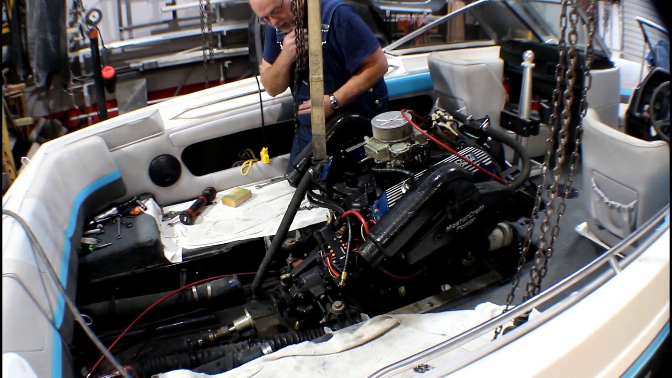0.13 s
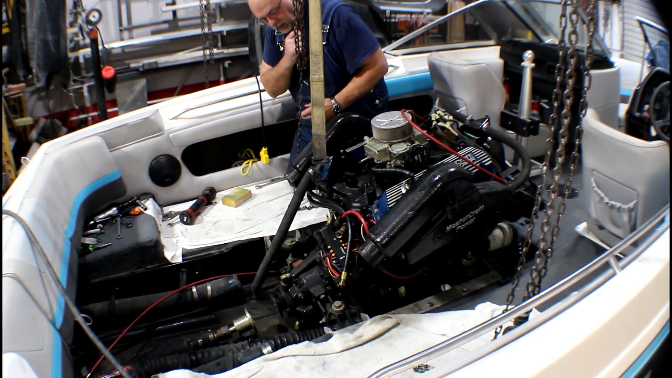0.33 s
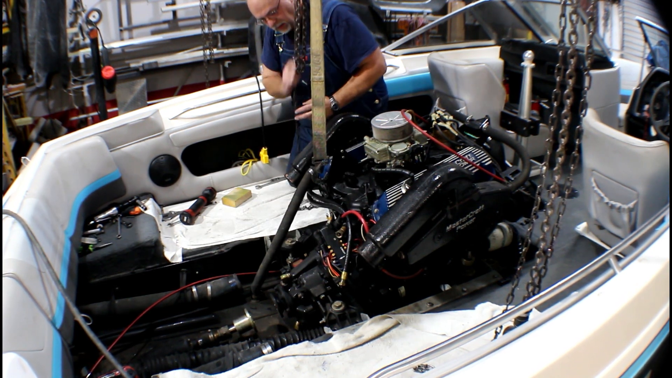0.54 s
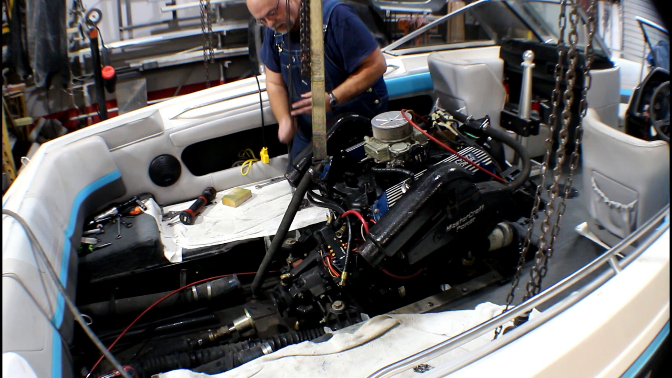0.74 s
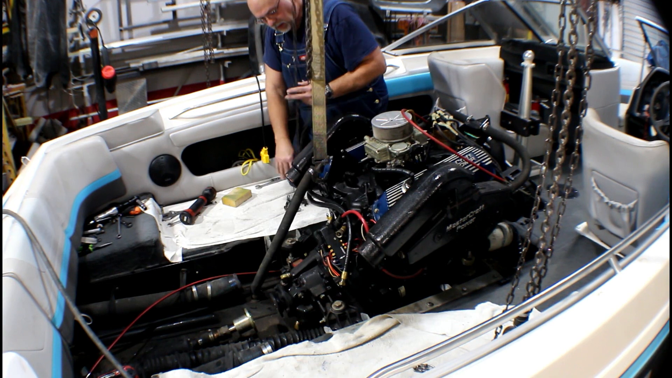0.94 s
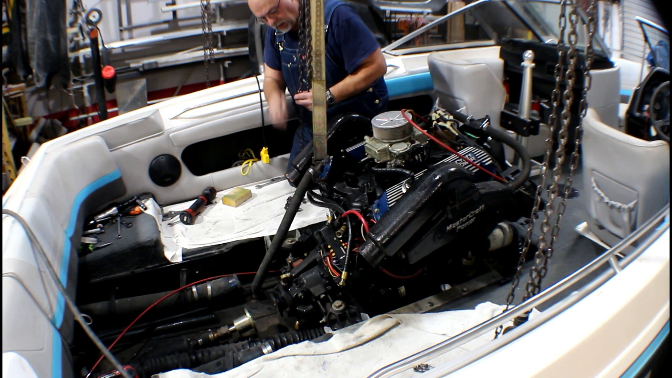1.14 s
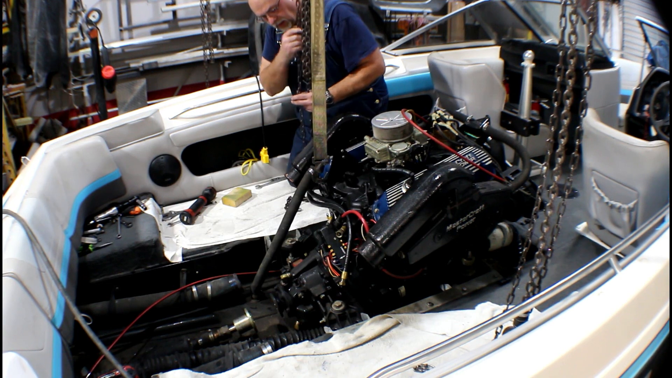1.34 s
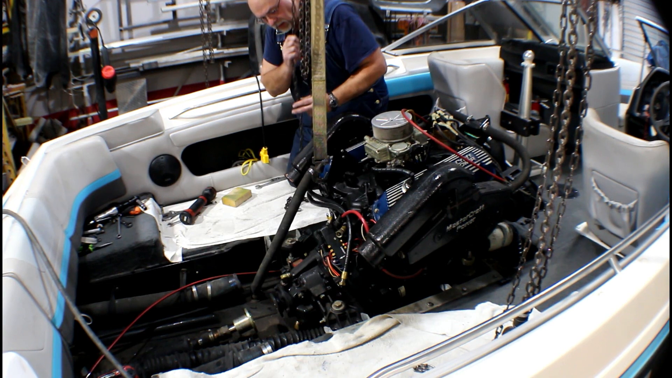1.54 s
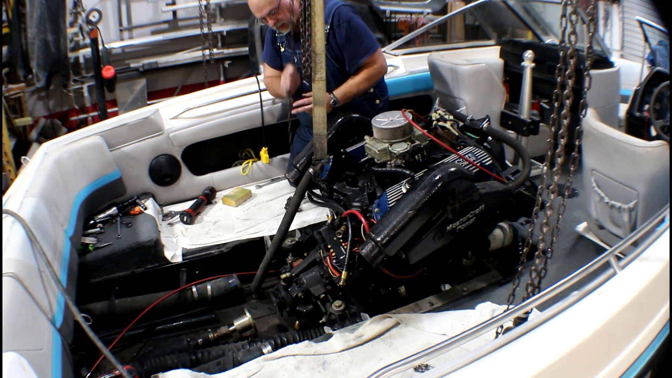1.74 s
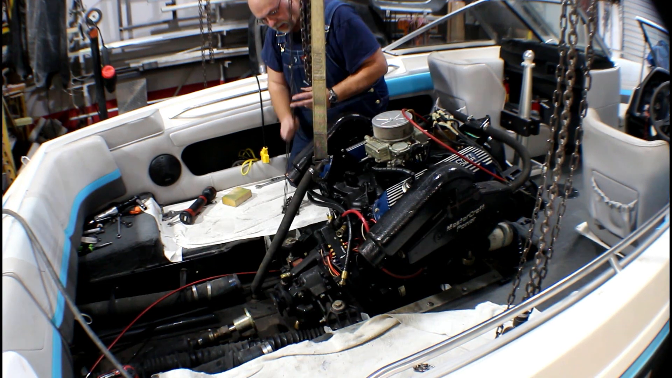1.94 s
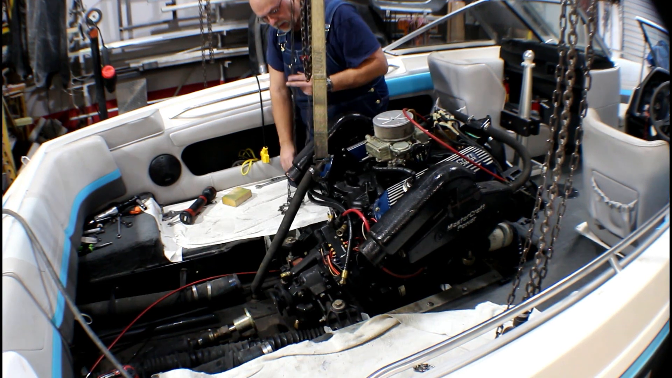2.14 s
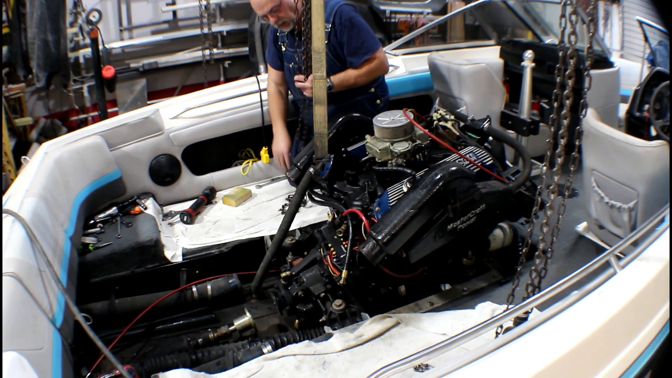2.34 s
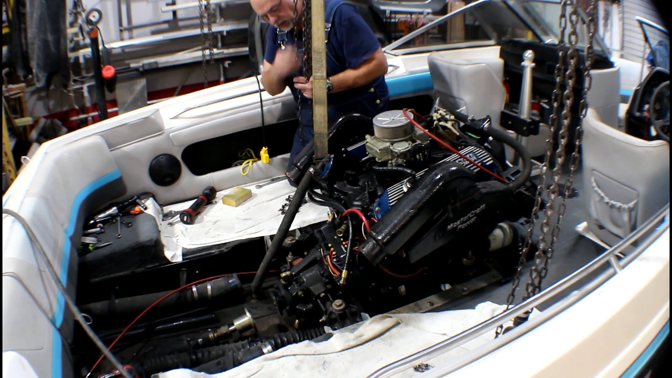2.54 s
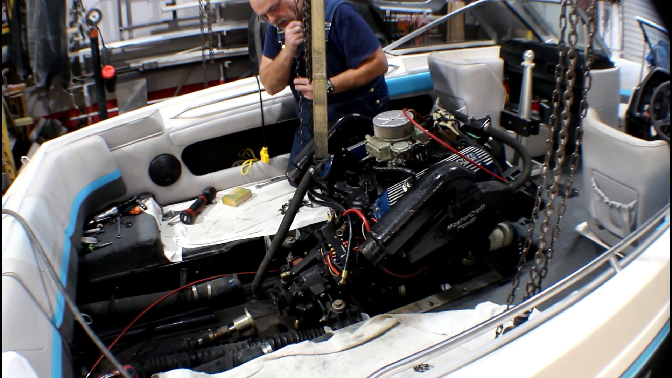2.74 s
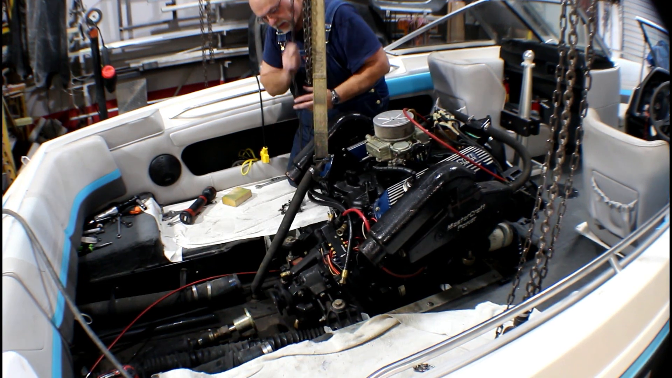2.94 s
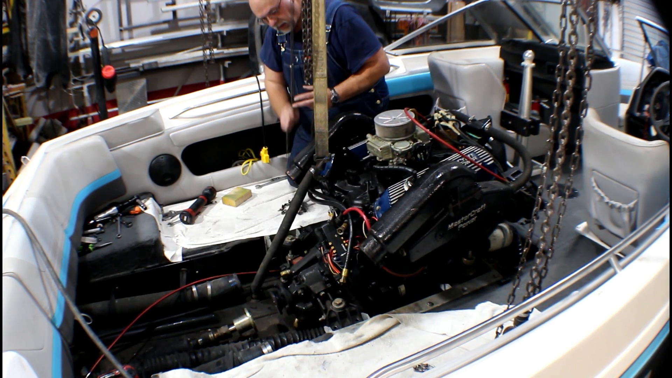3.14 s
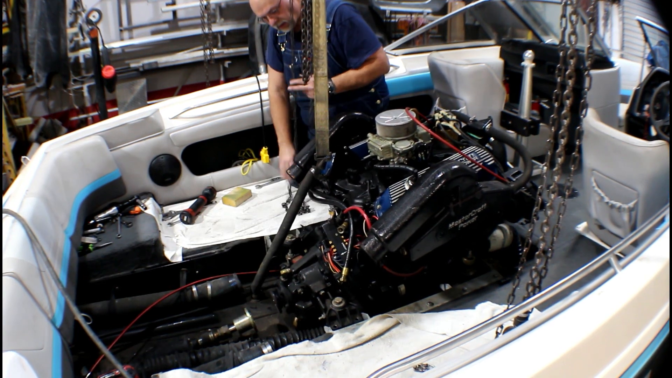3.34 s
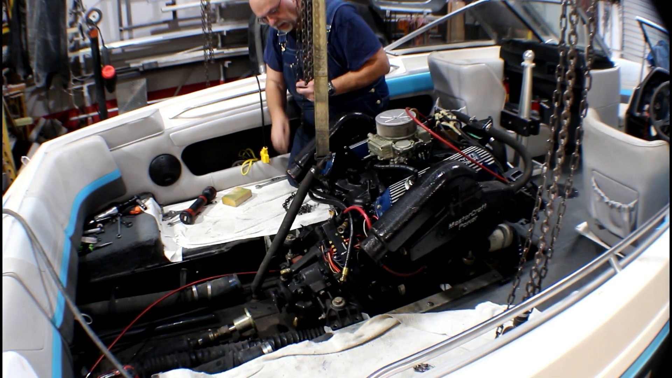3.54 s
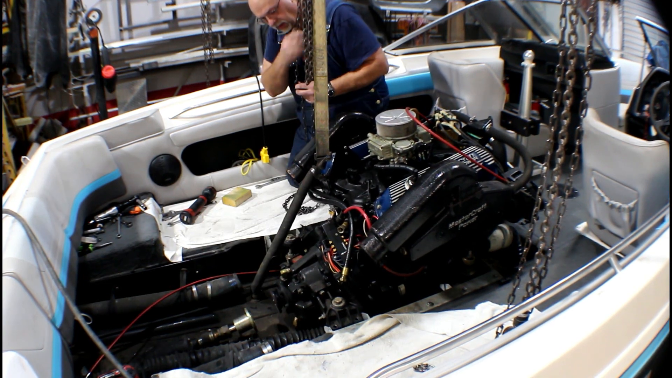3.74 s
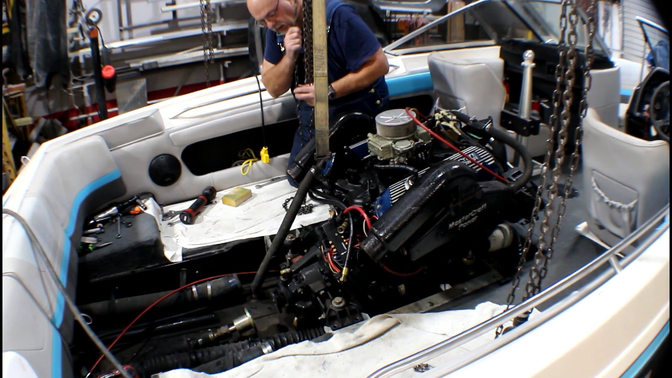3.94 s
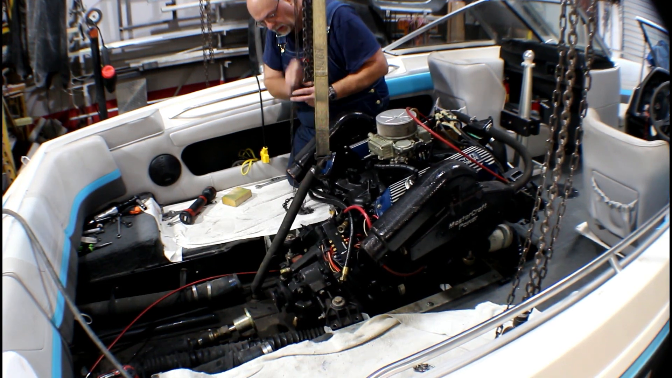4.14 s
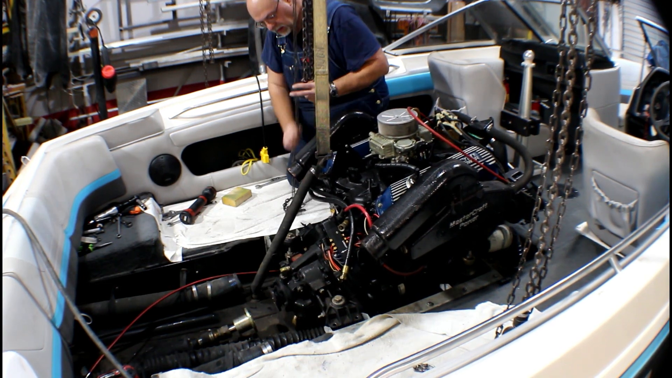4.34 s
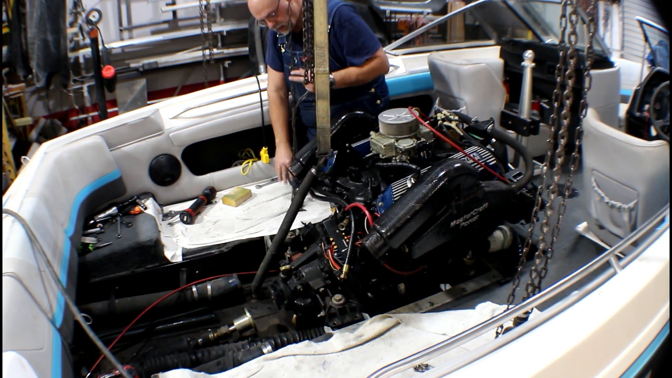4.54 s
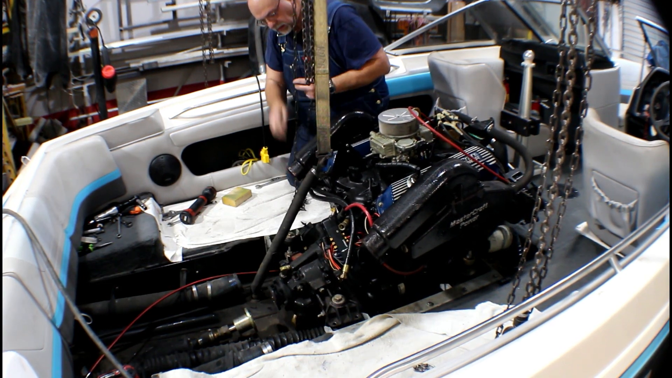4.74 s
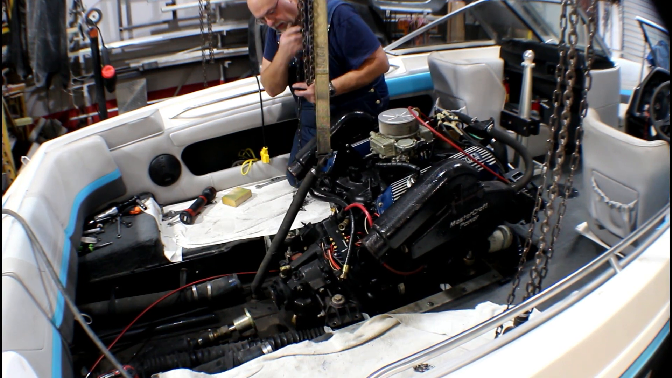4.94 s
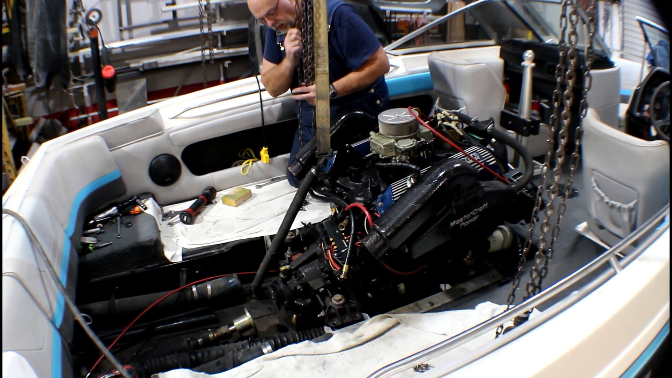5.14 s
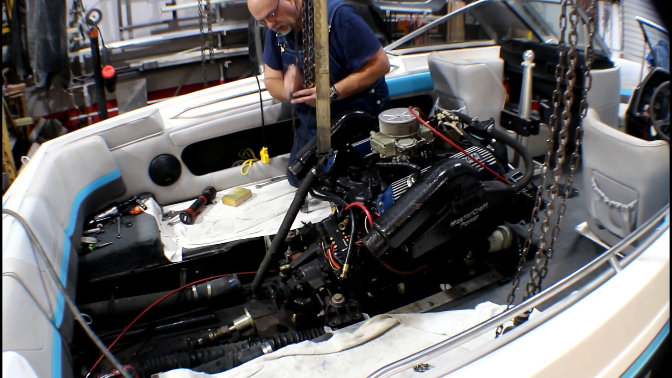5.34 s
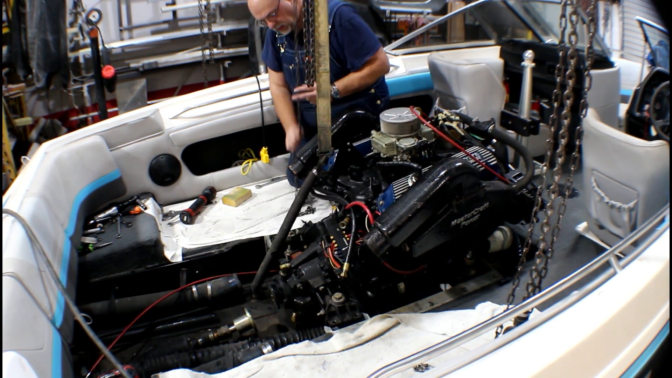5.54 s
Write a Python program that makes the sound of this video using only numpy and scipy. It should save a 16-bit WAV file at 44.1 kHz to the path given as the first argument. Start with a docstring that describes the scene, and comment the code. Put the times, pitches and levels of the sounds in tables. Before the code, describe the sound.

After a faint hum and a few light clicks, a hand chain hoist is pulled five times in a workshop. Each pull is a quick run of sharp ratchet snaps and clattering links that ring the steel housing, then slows and eases off. The slack chain ticks softly in the brief pauses. The hoist sounds clear and fairly near, with a short room echo.

```python
"""First come a low hum of air, a fading echo and a few light clicks; then a hand chain hoist in a
workshop is pulled five times. Its pawl (the catch) snaps over the toothed ratchet and chain links
clatter through the wheel. The blows ring the steel housing and a thin note in the wheel, and the
frame drones. Between pulls the slack chain ticks and the workshop rings on."""
import sys
import numpy as np
from scipy import signal
from scipy.fft import rfft, irfft
from scipy.io import wavfile

SR = 44100
rng = np.random.default_rng(int(sys.argv[2]) if len(sys.argv) > 2 else 0)


def materialize(psi):
    """Save the field psi as 16-bit PCM at rate SR to the path in sys.argv[1].

    A 1-D psi becomes a single channel; in a 2-D psi each row is a channel.
    """
    bounded = np.clip(np.atleast_2d(psi).T, -1, 1)
    quanta = np.round(bounded * 32767).astype(np.int16)
    wavfile.write(sys.argv[1], SR, quanta)


N = 247032

# Levels in the tables are relative: the functions set how loud each layer is.
# tone of the building's hum: (frequency [Hz], level [dB])
AIR_TONE = [(12, -38), (20, 6), (154, 6.5), (660, -1.5), (949, -1), (1290, -6), (4180, -8), (5850, -6.5),
            (11100, -45), (13900, -38), (16000, -44)]
# how long the workshop echoes: (frequency [Hz], time to fade by 60 dB [s])
ECHO_TIMES = [(250, 0.48), (1000, 0.48), (4000, 0.51), (8000, 0.53), (14000, 0.41)]
# slack chain touching itself: (time [s], ring level [dB], click compared to ring [dB], chatter [s])
CHAIN_TICKS = [(0.225, -38.5, -10, 0.011), (.276, -48, 3, .004), (.31, -55, -10, .004),
               (.329, -54, -4, .01), (1.328, -50, -6, 0.0036), (2.464, -43, -9, 0.0052),
               (2.511, -50, -15.5, 0.0065), (2.566, -47.5, 6, 0.0046), (2.612, -53, 5, .003),
               (2.707, -45, -7, .003), (2.742, -39, 2, 0.026), (3.647, -52, -26, .004),
               (3.879, -51, -4, .004), (3.936, -39.5, 4.5, .04), (3.988, -47, 12, .01),
               (4.836, -46, 3, 0.0098), (4.868, -54, 1, 0.0033), (4.887, -58, 15, .003),
               (4.927, -50, -7, 0.0089), (4.951, -50, 2, 0.0024), (4.976, -47, 6, .004),
               (4.986, -47.5, 6, .004), (5.024, -62, -1, .004), (5.124, -50, 2, .004)]
# ringing notes of a chain link: (pitch [Hz], width [Hz], level [dB]); narrow notes ring longer
LINK_NOTES = [(13450, 90, 0), (14060, 70, -1), (15120, 110, -8)]
# knocks with one clear note: (time [s], pitch [Hz], level [dB], time to fade by 60 dB [s])
KNOCK_NOTES = [(0.149, 1510, -38, 0.046), (0.199, 3010, -42, 0.043), (.265, 5420, -36, .06),
               (0.309, 2950, -31, 0.064), (0.407, 870, -25.5, 0.041), (.452, 2500, -26, 0.07),
               (.75, 2893, -24, .25), (0.851, 2852, -19.5, 0.14), (0.952, 2880, -28, .25),
               (1.044, 2950, -30, 0.22), (1.5, 2345, -45, 0.084), (1.58, 6000, -40, .04),
               (2.357, 616, -34, 0.047), (2.847, 6250, -31, 0.073), (2.876, 947, -25, 0.12),
               (2.96, 948, -18, 0.089), (3.18, 14400, -33, .15), (3.326, 3170, -32, 0.13),
               (3.646, 14500, -44, .04), (4.018, 6500, -40, 0.09), (5.019, 5100, -45, 0.058),
               (5.149, 947, -32, 0.07)]
# low notes of the frame: (pitch [Hz], width [Hz], level [dB])
FRAME_NOTES = [(150, 17, -5), (180, 14, -4.5), (334, 19.3, 1)]
# ringing notes of the steel housing: (pitch [Hz], width [Hz], level [dB])
HOUSING_NOTES = [(575.6, 28, -12.5), (805, 20, -10.5), (860, 55, -11), (939, 57, -9), (1002, 78, -13),
                 (1214, 45, -12.5), (1980, 65, -11.5), (2366, 115, -15), (2560, 44, -11.5), (2914, 68, -7),
                 (3198, 53, -10.5), (3257, 54, -8), (3548, 84, -11.5), (3890, 200, -16), (4360, 48, -11.5),
                 (4897, 117, -11), (5236, 103, -9), (5820, 75, -10.5), (5880, 46, -7.5), (5920, 68, -5.5),
                 (6280, 46, -9), (6576, 63, -8.5), (7510, 59, -5.5), (7623, 65, -7), (7784, 69, -15),
                 (7860, 37, -10), (8260, 105, -17.5), (9450, 63, -17), (11570, 170, -23)]
# tone of steel cracking on steel: (frequency [Hz], level [dB])
CRACK_TONE = [(150, -71), (250, -21), (651, -4), (938, -3.5), (1790, -5), (3230, -6.5), (4190, -7.5),
              (5930, -3), (7060, -8), (7700, -16), (8700, -13.5), (13900, -19), (16000, -26)]
# pulls on the chain: (start [s], full speed [s], slowing [s], stop [s], clatter level [dB],
# dull part compared to clatter [dB], slack take-up before start [s], slack rattle [dB], drone [dB])
PULLS = [(0.461, .70, 1.02, 1.146, -14.5, -4.5, 0.061, -30, -52),
         (1.582, 1.743, 2.132, 2.356, -17, -2, 0.034, -58, -49.5),
         (2.865, 3.013, 3.42, 3.593, -15, -3, 0.13, -48, -49),
         (4.042, 4.17, 4.52, 4.817, -15.5, -2.5, 0.11, -41, -48),
         (5.215, 5.35, 6.35, 5.86, -14.5, -2, 0.095, -40, -48.5)]
# pawl snaps and link blows: (time [s], dull part [dB], bright part [dB], clank [dB], wheel note [dB])
HITS = [(0.1506, -35, -37.5, -39.5, -57), (0.1994, -31, -39, -38.5, -55), (0.264, -49, -46, -46, -66),
        (0.3093, -22, -28, -37, -40.5), (0.407, -13, -27, -21, -32), (0.4715, -7.5, -6.5, -36, -37),
        (0.5108, -1.5, -7.5, -20, -22), (0.5534, -10.5, -12.5, -19, -21), (0.5791, -4.5, -12.5, -15, -30),
        (0.6246, -10.5, -12, -19, -40), (0.6699, -8, -12.5, -21, -28), (0.6866, -21, -19, -32, -42),
        (0.709, -10, -25, -27, -46), (0.746, -17, -19, -35, -25), (0.7837, -7, -18, -24, -17),
        (0.814, -9, -15, -35, -28), (0.851, -21, -23, -46, -32), (0.8887, -25, -16, -38, -33),
        (0.922, -26, -17, -29, -22), (0.9557, -11.5, -28, -34, -27), (0.9994, -14, -28, -24, -18.5),
        (1.0443, -17, -19, -38, -35), (1.066, -8.5, -15, -24, -22), (1.1257, -23, -15, -54, -30),
        (1.4332, -32.5, -63, -47, -69), (1.4814, -35, -43.5, -40, -59), (1.5989, -5.5, -7.5, -38, -23),
        (1.6466, -7.5, -12, -24.5, -41), (1.684, -20, -10.5, -44, -36), (1.712, -7, -11.5, -21, -31),
        (1.7424, -23, -23, -22, -35), (1.7701, -8, -10.5, -28, -20), (1.8107, -36, -19, -34, -38),
        (1.83, -11, -12, -27, -25), (1.8635, -20, -12, -39, -36), (1.8734, -8.5, -15, -39, -21),
        (1.917, -15, -15, -29, -48), (1.9584, -6, -14, -23, -45), (1.9988, -10.5, -11, -26, -37),
        (2.0388, -12, -16, -29, -32), (2.0789, -7, -14.5, -19.5, -24), (2.1044, -23, -20, -26, -35),
        (2.1188, -11, -21, -21, -26), (2.1587, -11, -15, -23, -42), (2.1894, -11, -14, -26, -35),
        (2.2071, -7, -13, -26, -39), (2.2687, -22, -16, -46, -38), (2.3572, -28, -25.5, -37, -62),
        (2.7447, -36, -39, -61, -60), (2.7896, -30.5, -40, -53, -56), (2.8677, -20, -28, -42, -40),
        (2.8755, -9.5, -17, -19, -22), (2.8918, -8, -12, -29, -43), (2.9296, -14, -10.5, -42, -40),
        (2.9602, -1, -11, -24, -22), (3.016, -4.5, -11, -15, -36), (3.0633, -6.5, -13, -29, -21),
        (3.089, -26, -20, -16.5, -26), (3.1003, -14, -18, -22.5, -33), (3.1362, -10.5, -19, -31, -22),
        (3.1713, -10, -25, -26, -20.5), (3.203, -9.5, -23, -28, -28), (3.232, -25, -36, -35, -24),
        (3.2643, -8, -35, -21, -23), (3.3235, -9, -15, -22, -30), (3.355, -17, -30, -33, -46),
        (3.4293, -14.5, -24, -29, -36), (3.444, -10.5, -17.5, -25, -40), (3.4988, -19.5, -17, -44, -38),
        (3.5713, -19, -32, -40, -49), (3.8784, -35, -67, -48, -70), (3.937, -38, -48, -53, -56),
        (3.985, -44, -37, -55, -51), (4.0178, -33, -30.5, -49, -54), (4.0476, -18, -7.5, -20, -32),
        (4.0578, -3.5, -13, -14.5, -49), (4.0822, -13, -19, -28, -30), (4.1114, -25, -12, -28, -18),
        (4.128, -5, -10.5, -22, -27), (4.1837, -7.5, -21, -17, -26), (4.2282, -9.5, -12, -17, -32),
        (4.2628, -8, -16, -31, -44), (4.2971, -20, -18, -30, -40), (4.333, -19, -17, -44, -38),
        (4.3641, -5, -21, -27, -25), (4.3971, -7.5, -15, -24, -23), (4.4297, -10, -16, -21.5, -21.5),
        (4.458, -25, -17, -46, -28), (4.4897, -16, -24, -24, -28), (4.5266, -11, -21, -22, -23),
        (4.574, -9, -16, -29, -34), (4.6203, -32, -18.5, -43, -35), (4.7157, -16, -26, -24.5, -34),
        (4.9504, -57, -40, -63, -63), (5.1482, -21.5, -40, -36, -55), (5.18, -28, -50, -34, -54),
        (5.2002, -18, -33, -24, -41), (5.2233, -12, -11, -27, -38), (5.2587, -22, -7, -37, -20),
        (5.269, -8, -14, -16, -36), (5.2853, -24, -27, -20, -41), (5.3124, -26, -23, -37, -33),
        (5.3343, -9.5, -17, -28, -24), (5.384, -9, -16, -35, -30), (5.4255, -9, -14, -24, -28),
        (5.454, -21, -16, -26, -33), (5.466, -9.5, -13.5, -29, -27), (5.5005, -15, -26, -29, -42),
        (5.5468, -16, -16, -27, -28), (5.5748, -4.5, -15, -21, -26)]

CLANK_HZ, BRIGHT_HZ = 1190, 3980  # clanks lie below these, dull blows between, bright ones above


def undb(db):
    """Turn decibels into a gain."""
    return 10 ** (np.asarray(db, float) / 20)


def unit(x):
    """Scale x to an average power of 1."""
    return x / np.sqrt(np.mean(x ** 2))


def along(table, hz):
    """Read a (frequency, value) table on a scale of octaves."""
    freqs, values = np.transpose(table)
    return np.interp(np.log(np.maximum(hz, 1)), np.log(freqs), values)


def below(hz, edge):
    """A gain near 1 below the edge frequency and near 0 above it."""
    return 1 / (1 + (hz / edge) ** 4)


def coloured(x, gain):
    """Shape the tone of x with the curve gain(hz); white noise keeps its power."""
    curve = gain(np.fft.rfftfreq(len(x), 1 / SR))
    return irfft(rfft(x) * unit(curve), len(x))


def waver(count):
    """A slow wander through count random values."""
    return np.interp(np.arange(N), np.linspace(0, N, count), rng.standard_normal(count))


def resonate(x, hz, width):
    """Let x ring one note, with a gain of about 1 at its pitch."""
    r = np.exp(-np.pi * width / SR)
    return signal.lfilter([1 - r, 0, r - 1], [1, -2 * r * np.cos(2 * np.pi * hz / SR), r * r], x)


def ring(notes, force, kick=lambda hz: 0):
    """Ring each note with a sharp kick and a noisy force, so no two blows sound alike."""
    return sum(undb(db) * resonate(kick(hz) + force(hz) * rng.standard_normal(N), hz, width)
               for hz, width, db in notes)


def strikes(times, db):
    """The first sharp contact of each blow, pushing one way or the other."""
    x = np.zeros(N)
    x[(times * SR).astype(int)] = undb(db) * rng.choice([-1, 1], len(times))
    return x


def blows(times, db, contact_s):
    """The force of each blow: it builds quickly, then dies away."""
    x = np.zeros(N)
    np.add.at(x, np.clip((np.asarray(times) * SR).astype(int), 0, N - 1), undb(db))
    fading = signal.lfilter([1], [1, -np.exp(-1 / (contact_s * SR))], x)
    rise = np.exp(-1 / (0.38 * contact_s * SR))
    return signal.lfilter([1 - rise], [1, -rise], fading)


def air():
    """The building hums, wavering a little, over a rumble that comes and goes."""
    hum = unit(coloured(rng.standard_normal(N), lambda hz: undb(along(AIR_TONE, hz))))
    hum *= undb(-53.5 + 1.5 * waver(count=30))
    rumble = unit(resonate(resonate(rng.standard_normal(N), hz=55, width=50), hz=55, width=50))
    return hum + rumble * undb(-71 + 3 * waver(count=20))


def workshop_echo(x):
    """A large, cluttered room smears x into a smooth tail; the highest treble dies first."""
    t = np.arange(SR) / SR
    tail = 0
    for centre in 125 * 2. ** np.arange(8):
        octave = lambda hz: np.exp(-np.log2(np.maximum(hz, 1) / centre) ** 2 * 2)
        noise = coloured(rng.standard_normal(SR), octave) * np.sqrt(centre)
        tail += noise * undb(-60 * t / along(ECHO_TIMES, centre))
    tail *= 1 - np.exp(-t / 0.0047)
    return signal.fftconvolve(x, tail / np.sqrt(np.sum(tail ** 2)))[:N]


def opening_echo(steel):
    """At the start, the room still rings from a pull that ended a moment before."""
    start, end, gap = (int(s * SR) for s in (1.7, 2.2, .15))
    one_pull = np.zeros(N)
    one_pull[start:end] = steel[start:end]
    return np.pad(workshop_echo(one_pull)[end + gap:], (0, end + gap))


def slack_chain():
    """Loose links touch with a thin click and a high ring; some chatter on briefly."""
    times, db, click_db, chatter_s = np.transpose(CHAIN_TICKS)
    force = sum(blows([at], level, length) for at, level, length in zip(times, db, chatter_s))
    bursts = blows(times, db + click_db, contact_s=0.0023) * rng.standard_normal(N)
    click = coloured(bursts, lambda hz: hz / (hz + 7000))
    return undb(14.5) * ring(LINK_NOTES, lambda hz: force) + undb(7) * click


def knocks():
    """Each knock rings one note that fades away."""
    out, age = np.zeros(N + SR), np.arange(SR // 2) / SR
    for at, hz, db, fade_s in KNOCK_NOTES:
        level = undb(db - 60 * age / fade_s) * (1 - np.exp(-age / 0.00055))
        start = int(at * SR)
        out[start:start + len(age)] += level * np.sin(2 * np.pi * hz * age)
    return out[:N]


def wheel_note(hz=4424, fade_s=.25, jolt_cycles=.14):
    """The wheel's thin note: each blow jolts it and sets it to a new strength."""
    times, *_, db = np.transpose(HITS)
    t = np.arange(N) / SR
    last_hit = np.maximum(np.searchsorted(times, t) - 1, 0)
    age = np.maximum(t - times[last_hit], 0)
    level = undb(db[last_hit] - 60 * age / fade_s) * (t > times[0])
    phase = 2 * np.pi * jolt_cycles * np.cumsum(rng.standard_normal(len(times)))
    return level * np.sin(2 * np.pi * hz * t + phase[last_hit])


def frame_drone(rest_db=-66., fade_s=0.14):
    """The frame's low, wavering drone swells towards the end of each pull."""
    t = np.arange(N) / SR
    level_db = np.full(N, rest_db)
    for start, _, _, stop, *_, drone_db in PULLS:
        swell_db = np.interp(t, [start, stop, stop + fade_s], [-11, 0, -20], left=-99)
        level_db = np.maximum(level_db, drone_db + swell_db)
    return undb(level_db + 4.5 * waver(count=70)) * unit(ring(FRAME_NOTES, lambda hz: 1))


def pull_levels(rest_db=-60.):
    """Levels of the clatter and its dull part: a pull takes up slack, speeds up, holds and slows."""
    t = np.arange(N) / SR
    clatter_db, dull_offset_db = np.full(N, rest_db), np.zeros(N)
    for start, full, slows, stop, db, dull_db, slack_s, slack_db, _ in PULLS:
        speed_db = np.interp(t, [start, full, slows, stop], [-7, 0, 0, -30.5], left=-99, right=-99)
        begun = t > start - slack_s
        clatter_db = np.maximum(clatter_db, np.where(begun & (t < start), slack_db, db + speed_db))
        dull_offset_db[begun] = dull_db
    return clatter_db, clatter_db + dull_offset_db


def clatter(per_second, scatter_db, contact_s):
    """The force of many small link blows at random moments, a few much harder than the rest."""
    count = int(per_second * N / SR)
    return unit(blows(rng.uniform(0, N / SR, count), rng.exponential(scatter_db, count), contact_s))


def hoist():
    """Pawl and links hit steel on steel: each blow snaps, cracks and rings the housing."""
    times, dull_db, bright_db, clank_db, _ = np.transpose(HITS)
    clatter_db, rattle_db = pull_levels()
    rattle = undb(rattle_db) * clatter(per_second=300, scatter_db=3.3, contact_s=0.0029)
    clank = undb(-6.5) * rattle + undb(7) * blows(times, clank_db, contact_s=.005)
    dull = undb(-7) * rattle + undb(-0.5) * blows(times, dull_db, contact_s=.003)
    bright = undb(clatter_db - 4) * clatter(per_second=500, scatter_db=1.32, contact_s=0.0022)
    bright += blows(times, bright_db - 1, contact_s=0.0048)
    bright += blows(times, bright_db + 3, contact_s=0.0013)

    # each of the three forces drives its own range of pitches
    low = lambda hz: below(hz, CLANK_HZ)
    mid = lambda hz: below(hz, BRIGHT_HZ) - low(hz)
    high = lambda hz: 1 - below(hz, BRIGHT_HZ)
    force = lambda hz: low(hz) * clank + mid(hz) * dull + high(hz) * bright
    kick_db = lambda hz: (low(hz) * (clank_db + 27) + mid(hz) * (dull_db + 11)
                          + high(hz) * (bright_db + 18))
    housing = ring(HOUSING_NOTES, force, kick=lambda hz: strikes(times, kick_db(hz)))

    tone = lambda hz: undb(along(CRACK_TONE, hz))
    crack = sum(undb(db) * coloured(push * rng.standard_normal(N), lambda hz: tone(hz) * band(hz))
                for band, push, db in ((low, clank, -19), (mid, dull, -10), (high, bright, -9)))
    snap = coloured(strikes(times, dull_db), lambda hz: tone(hz) * below(hz, 7200))
    link_click = coloured(strikes(times, bright_db), lambda hz: 1 - below(hz, 7000))
    return undb(15) * housing + crack + undb(3.8) * snap + undb(-4) * link_click


def scene():
    """Mix the hoist, its echo and the air into one channel."""
    steel = hoist() + frame_drone() + slack_chain() + knocks()
    note = wheel_note()
    echo = workshop_echo(steel + undb(-8) * note)
    return (steel + note + undb(-1.5) * echo + opening_echo(steel) + air())[None]


def record(dry):
    """Round off the hardest peaks and cut the very highest treble."""
    soft = np.tanh(0.69 * dry) / 0.73
    treble_cut = signal.ellip(10, .2, 80, 15750, fs=SR, output="sos")
    return signal.sosfilt(treble_cut, soft)


dry = scene()
out = record(dry)
materialize(out)
```